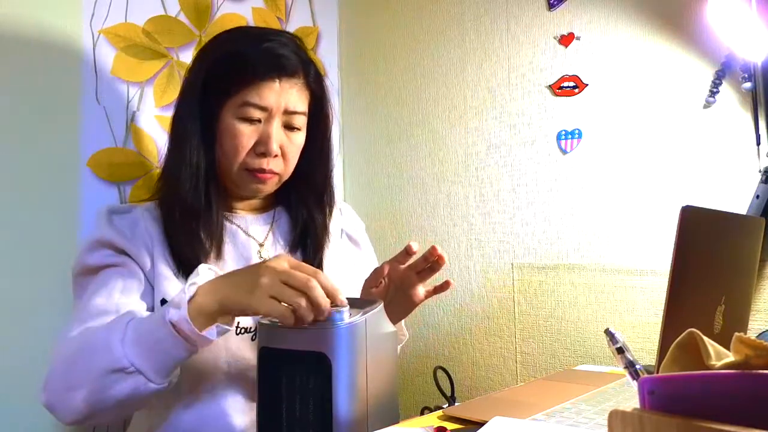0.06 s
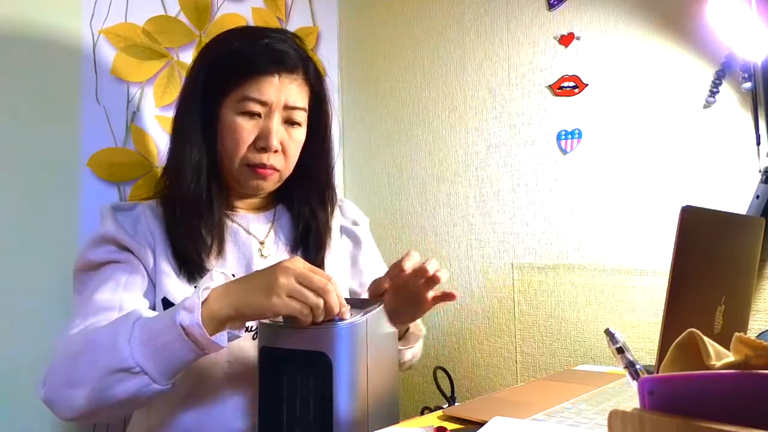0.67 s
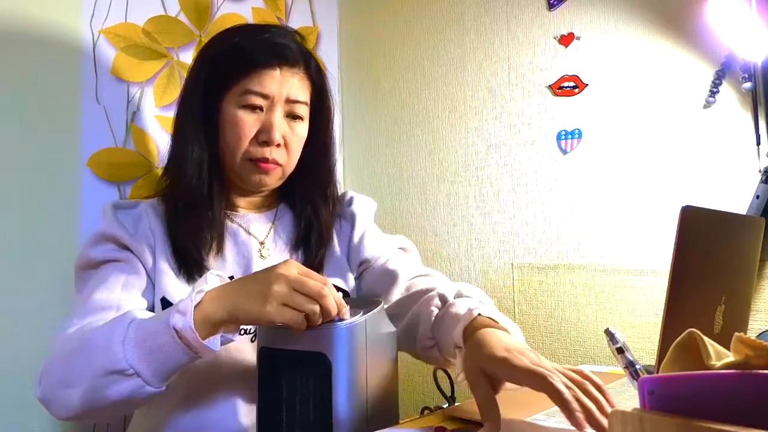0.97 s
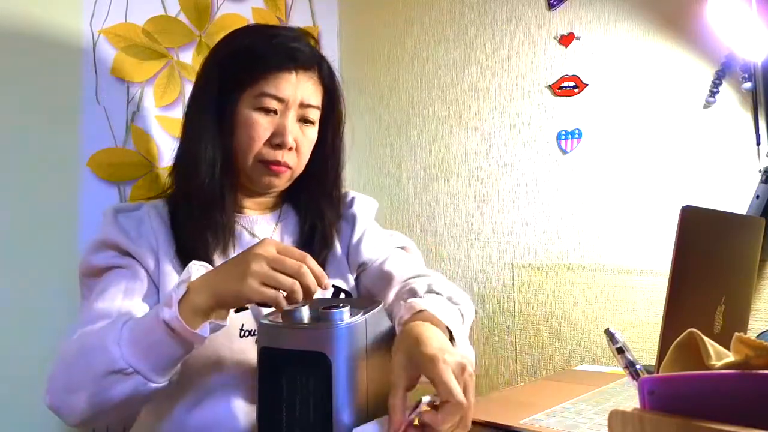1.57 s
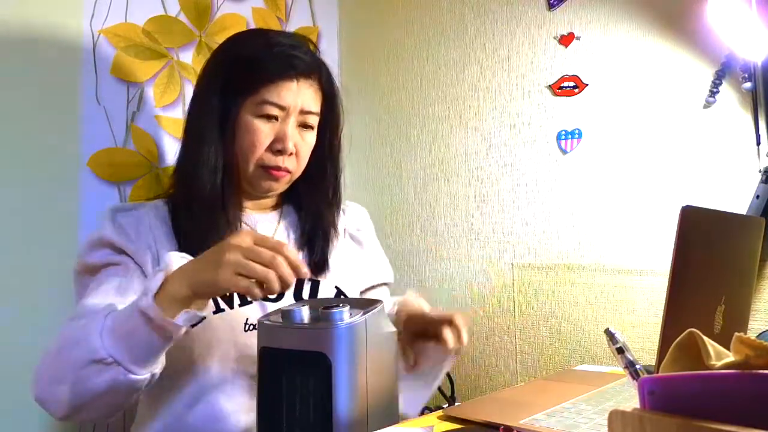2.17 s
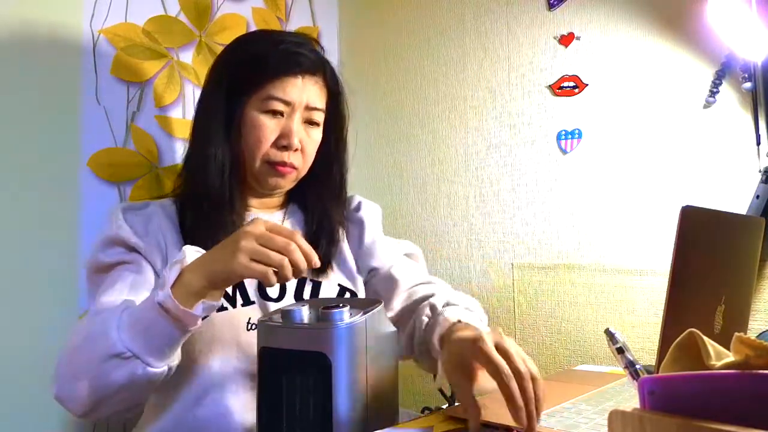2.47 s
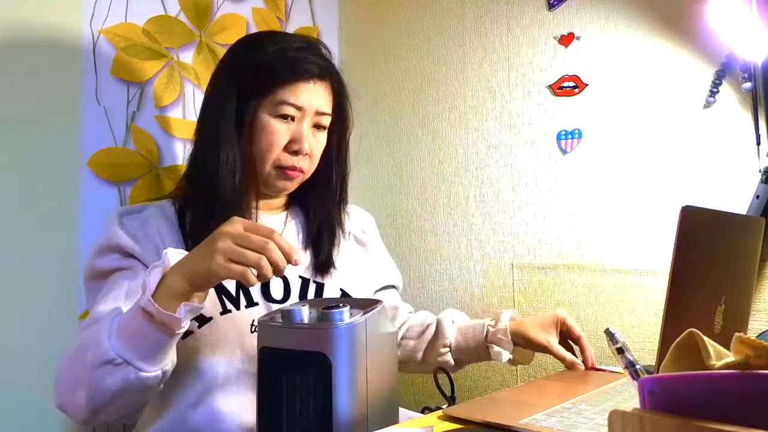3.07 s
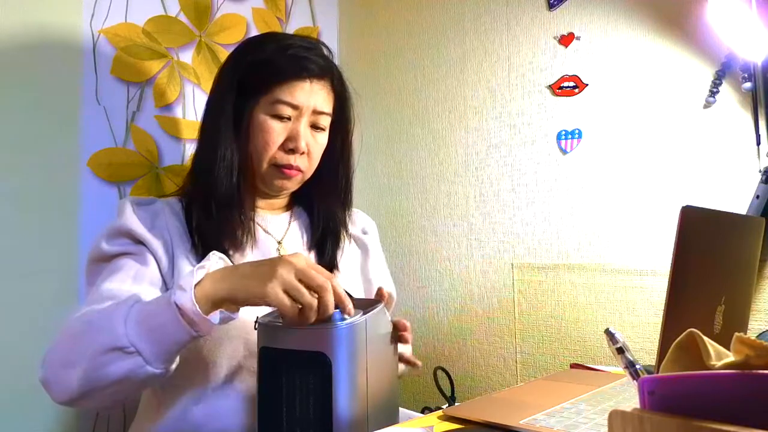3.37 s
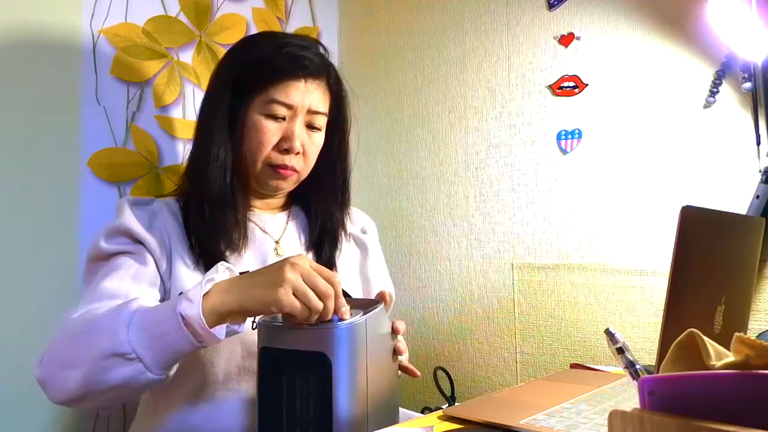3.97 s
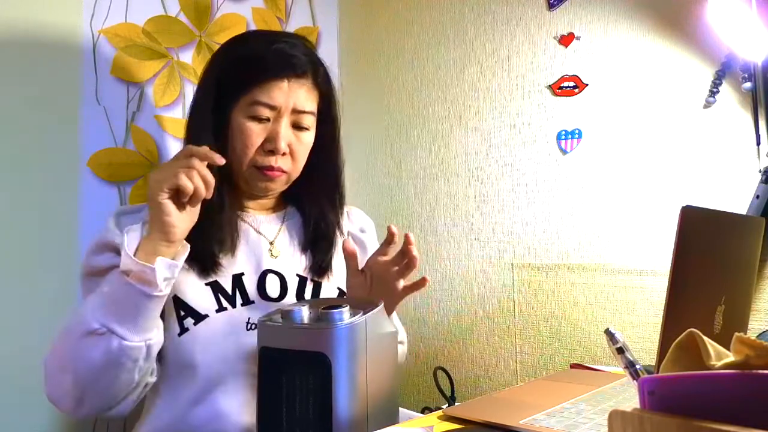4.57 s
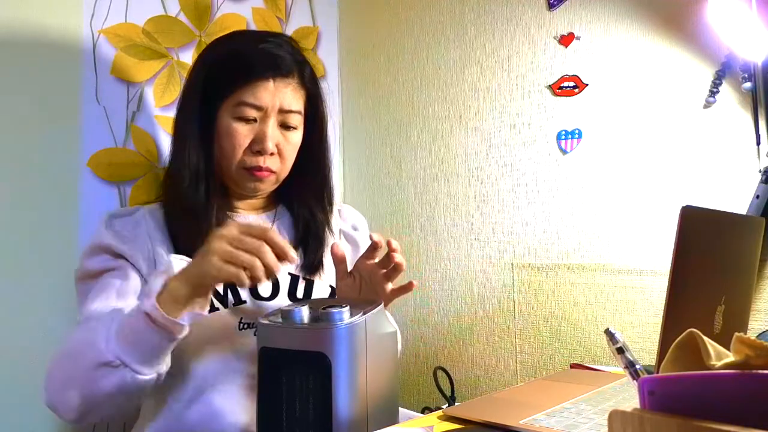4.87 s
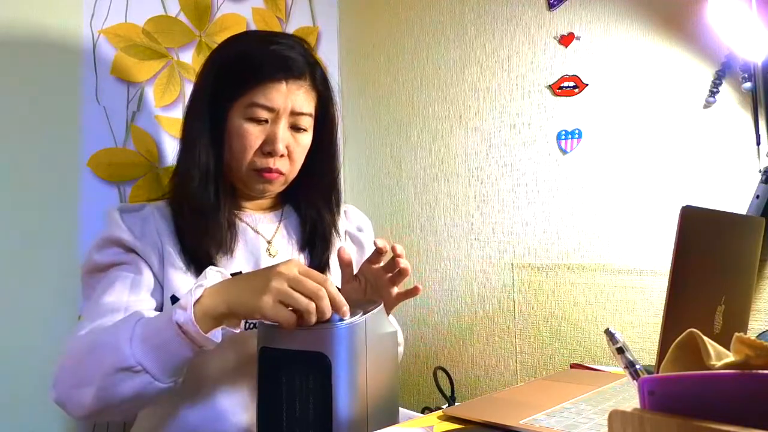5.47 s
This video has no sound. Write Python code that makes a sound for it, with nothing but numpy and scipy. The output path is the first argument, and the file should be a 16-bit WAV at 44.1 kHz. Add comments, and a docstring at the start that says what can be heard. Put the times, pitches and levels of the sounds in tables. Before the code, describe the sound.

A quiet small room holds soft noise, low hums that come and go, and a faint thin whine. A clockwork ticks faintly throughout, about every 0.6 seconds. At 0.2 seconds a small heater's plastic knob clicks. From 1 second a folded paper is picked up, rubbing and crackling. It knocks on the desk at 1.4 seconds and again at 1.6, the loudest moment, when a small metal thing jingles brightly under it. The paper slides around 1.8 seconds, lands with a crackling knock at 2.3, and rustles more softly at 2.6. A faint knock comes at 3 seconds, and the metal thing clinks on the desk at 3.2. The knob clicks twice around 3.4 seconds with a dull finger scrape. Its spring snaps at 4.2, and softer clicks follow at 4.4 and 5.1 seconds. The handling sounds are close and fairly dry.

```python
"""A quiet room: soft noise, low hums that come and go, a faint whine. The plastic knob of a small heater
clicks, and a clockwork ticks faintly throughout. From 1 s a hand picks up a folded paper, which rubs and
crackles as it is knocked on the desk, slid and put down; a small metal thing jingles under it.
At 3.2 s the metal thing, held differently, clinks on the desk. Then the knob clicks twice, with a dull
finger scrape; its spring snaps at 4.2 s, and two softer clicks follow."""
import sys
import numpy as np
from scipy import signal
from scipy.fft import rfft, irfft, next_fast_len
from scipy.io import wavfile
from scipy.ndimage import uniform_filter1d

SR = 44100
rng = np.random.default_rng(int(sys.argv[2]) if len(sys.argv) > 2 else 0)


def transcribe(u):
    """Save the signal u as a 16-bit wav file named by the first command-line argument.

    u: samples, shape (n,) or (channels, n), limited to [-1, 1]; the rate is SR.
    q: integer samples, one column per channel.
    """
    v = np.clip(np.atleast_2d(u).T, -1, 1)
    q = np.round(v * 32767).astype(np.int16)
    wavfile.write(sys.argv[1], SR, q)


N = 248327
T = np.arange(N) / SR
AGE = np.arange(8192) / SR  # seconds into one short event

# modes of the desk top, rung by sliding and by knocks: pitch_hz, level_db, t60_s
DESK_MODES = [(232, 2, 0.088), (280, 3.5, 0.079), (344, -1.5, 0.086), (573, -2.5, 0.18), (689, 1, 0.094),
              (980, -6, 0.06), (982, 4.5, .1), (1740, 10, 0.034), (3520, -15, 0.12), (3920, -18, 0.15),
              (4660, -5, 0.045), (4680, -9, 0.03), (5280, -5, .06), (5700, -19, 0.078)]


def amp(db):
    """Decibels to gain."""
    return 10 ** (np.asarray(db) / 20)


def unit(x):
    """Scale to unit energy."""
    return x / np.sqrt(np.sum(x ** 2))


def loudest(x, db):
    """Scale so that the loudest two milliseconds have this level."""
    return x * amp(db) / np.sqrt(uniform_filter1d(x ** 2, size=88).max())


def fade(t60):
    """Exponential decay, 60 dB down after t60 seconds."""
    return np.exp(-np.log(1000) * AGE / max(t60, 1e-3))


def add(track, start_s, x):
    """Mix a sound into the track."""
    i = int(start_s * SR)
    track[i:i + len(x)] += x[:N - i]


def walk(rate_hz):
    """Smooth random drift with a spread near one."""
    hold = int(SR / rate_hz)
    steps = np.repeat(rng.standard_normal(N // hold + 1), hold)
    return uniform_filter1d(steps, hold)[:N] / np.sqrt(2 / 3)


def swell(peak_s, db, rise_s, fall_s, shape):
    """Gain that climbs 20 dB over rise_s and drops 20 dB over fall_s; shape 1 is pointed, 2 round."""
    away = np.maximum((peak_s - T) / max(rise_s, 1e-3), (T - peak_s) / max(fall_s, 1e-3))
    return amp(db - 20 * np.minimum(away, 10) ** shape)


def colour(x, points):
    """Minimum-phase EQ through (freq_hz, gain_db) points: nothing rings ahead of an attack."""
    size = next_fast_len(len(x) // 2 + 1024, True) * 2
    hz, db = np.transpose(points)
    freqs = np.maximum(np.fft.rfftfreq(size, 1 / SR), 1)
    gain = amp(np.interp(np.log(freqs), np.log(hz), db))
    cepstrum = irfft(np.log(gain))
    cepstrum[1:size // 2] *= 2
    cepstrum[size // 2 + 1:] = 0
    return irfft(rfft(x, size) * np.exp(rfft(cepstrum)))[:len(x)]


def ringing(modes):
    """A struck object's modes, each slightly detuned and at a random phase."""
    chance = rng.standard_normal((len(modes), 2))
    return unit(sum(amp(db) * fade(t60) * np.sin(2 * np.pi * (hz * (1 + 0.0052 * detune) * AGE + phase))
                    for (hz, db, t60), (detune, phase) in zip(modes, chance)))


def clatter(t60):
    """Dense dying vibration with an even spectrum."""
    spectrum = rfft(rng.standard_normal(len(AGE)) * fade(t60))
    contour = np.sqrt(uniform_filter1d(np.abs(spectrum) ** 2, size=120))
    return unit(irfft(spectrum / contour) * fade(10 * t60))


def blows(hits, eq, modes, ring_db, crack_db):
    """Impacts of crack, clatter and ring; contact sets the treble, the spot struck shapes one band."""
    out = np.zeros(N)
    for start_s, db, t60, treble_db, body_hz, body_db in hits:
        hit = clatter(t60) + amp(ring_db) * ringing(modes)
        hit[0] += amp(crack_db)
        hit = colour(hit, eq)
        hit = colour(hit, [(3500, 0), (9000, treble_db)])
        hit = colour(hit, [(body_hz / 1.87, 0), (body_hz, body_db), (body_hz * 1.6, 0)])
        add(out, start_s, loudest(hit, db))
    return out


def room_tone(handling, level_db=-61.5, dip_db=-14.0, recover_s=0.07, flicker_db=0.63):
    """Soft room noise, wider than the near sounds; it ducks briefly after loud handling."""
    # tone of the room noise: freq_hz, gain_db
    noise_eq = [(15, -66), (25, -33), (53, -18), (73, -12), (96, -9.5), (140, -12.5), (289, -10),
                (782, -16.5), (871, -11.5), (1110, -19), (1660, -19.5), (1800, -19), (2170, -21),
                (7910, -30.5), (15500, -43)]
    # its stereo width: freq_hz, side_minus_mid_db
    noise_width = [(60, -9.5), (110, -9), (200, -2), (380, -2), (700, -2.5), (1290, -3), (2380, -3.5),
                   (4400, -1), (8120, 0), (15000, -1)]
    mid, side = (colour(rng.standard_normal(N), noise_eq) for _ in range(2))
    side = colour(side, noise_width)
    step = 1 / (recover_s * SR)
    recent_power = signal.lfilter([step], [1, step - 1], handling ** 2)
    duck = recent_power / (recent_power + amp(-55))
    db = level_db + flicker_db * walk(6.7) + dip_db * duck
    return np.array([mid + side, mid - side]) / mid.std() * amp(db)


def hum(hz, gain, waver_hz=0.34):
    """A tone that wavers slightly in pitch."""
    phase = 2 * np.pi * np.cumsum(hz + waver_hz * walk(4.4)) / SR
    return np.sqrt(2) * np.sin(phase) * gain


def hums(upper_hz=111.3, lower_hz=91, whine_hz=1676, whine_db=-79):
    """Two low hums that come and go, and a thin steady whine."""
    # swells of the upper hum: peak_s, level_db, rise_s, fall_s
    upper_swells = [(.45, -64, 0.58, .95), (1.48, -69.5, 0.46, 0.67)]
    # swells of the lower hum: peak_s, level_db, rise_s, fall_s
    lower_swells = [(1.37, -66, .3, 0.22), (2.3, -71.5, 0.73, 0.98), (4.05, -61.5, 1, 0.66),
                    (5.4, -75.5, .9, .9)]
    upper = hum(upper_hz, sum(swell(*row, shape=1.7) for row in upper_swells))
    lower = hum(lower_hz, sum(swell(*row, shape=1.7) for row in lower_swells))
    return upper + lower + hum(whine_hz, amp(whine_db), waver_hz=8)


def knob_clicks():
    """Each click of the knob rings the heater's plastic shell."""
    # knob clicks: start_s, level_db, t60_s, treble_db, body_hz, body_db
    click_hits = [(.1566, -42, 0.077, 10, 1500, 9), (3.3518, -41, 0.091, 7.5, 940, 4),
                  (3.4642, -39.5, 0.051, 11.5, 705, 10.5), (4.378, -51.5, 0.18, -6, 640, 17),
                  (5.0732, -50.5, 0.098, 11, 1500, 7.5)]
    # tone of a click: freq_hz, gain_db
    click_eq = [(120, -57), (200, 8.5), (1050, 1.5), (1330, 0.5), (1630, -7.5), (2020, 0), (2330, 5),
                (4310, 3.5), (12300, -24), (15000, -40)]
    # modes of the shell: pitch_hz, level_db, t60_s
    shell_modes = [(712, -11.5, 0.11), (1100, -1, 0.089), (1632, 9.5, 0.062), (2300, -3.5, 0.074),
                   (2907, 3.5, 0.055), (4450, -3.5, 0.035), (5380, -0.5, 0.028)]
    return blows(click_hits, click_eq, shell_modes, ring_db=-2.5, crack_db=-17)


def clockwork(first_s=.219, period_s=.5945, lock_s=.0165, bounce_s=.011, bounce_db=-7, spread_db=1.4):
    """Steady ticks: in each the escapement scrapes free, locks with a small ring and bounces once."""
    # tone of a tick: freq_hz, gain_db
    tick_eq = [(300, -4), (1000, 1), (2200, 1), (3300, -7), (4300, -1.5), (5000, -1.5), (7200, 0.5),
               (8200, -11.5), (14000, -24.5)]
    # modes of the escapement: pitch_hz, level_db, t60_s
    tick_modes = [(4150, -6, 0.027), (4190, -2, 0.04), (4440, -4.5, .04), (4380, 3, .025),
                  (4930, -9, 0.033), (6330, -13, .03), (7280, -11, .025)]
    out = np.zeros(N)
    soft_attack = 1 - np.exp(-(AGE / .008) ** 2)
    for tick_s in np.arange(first_s, T[-1], period_s):
        scrape_db, lock_db = np.array([-52, -47]) + spread_db * rng.standard_normal(2)
        scrape = colour(clatter(.13) * soft_attack, tick_eq)
        add(out, tick_s - .007, loudest(scrape, scrape_db))
        for lag_s, db in ((lock_s, lock_db), (lock_s + bounce_s, lock_db + bounce_db)):
            lock = clatter(0.086) + amp(-1) * ringing(tick_modes)
            add(out, tick_s + lag_s, loudest(colour(lock, tick_eq), db))
    return out


def strokes():
    """Envelopes of the rubbing and of its treble: each stroke speeds up and slows down."""
    # rubbing strokes, paper sliding on the desk, then a dull finger scrape by the knob click:
    # fastest_s, level_db, rise_s, fall_s, treble_db
    rubbing_strokes = [(1.1, -36.5, .058, .1, 1.5), (1.178, -41, .022, .028, 5), (1.43, -50, .06, .2, 3),
                       (1.552, -37.5, .04, .036, -1), (1.623, -41.5, .012, .04, -8),
                       (1.81, -31, .11, .11, 2), (1.9, -42, .07, .055, -17), (1.977, -44.5, .048, .03, 8),
                       (2.17, -61, .025, .025, 9), (2.33, -33, .016, .025, 0), (2.368, -46, .025, .035, -4),
                       (2.584, -39.5, .022, .05, 1), (2.636, -44, .022, .024, -8),
                       (3.12, -68, .18, 0.11, 11), (3.453, -52, .05, 0.03, -4)]
    power, treble_power = 0, 0
    for fastest_s, db, rise_s, fall_s, treble_db in rubbing_strokes:
        stroke = swell(fastest_s, db, rise_s, fall_s, shape=1.25) ** 2
        power += stroke
        treble_power += stroke * amp(treble_db) ** 2
    return np.sqrt(power), np.sqrt(treble_power)


def air_pocket(effort, rest_hz=620, fast_hz=1016, halfway_db=-41, width_hz=130):
    """Air trapped under the sheet resonates as a noise band, higher as a faster stroke lifts the sheet."""
    lowpass = signal.butter(2, width_hz, fs=SR, output="sos")
    wobble = signal.sosfilt(lowpass, rng.standard_normal(N) + 1j * rng.standard_normal(N))
    hz = rest_hz + (fast_hz - rest_hz) * effort / (effort + amp(halfway_db))
    band = np.real(wobble * np.exp(2j * np.pi * np.cumsum(hz) / SR))
    return band / band.std()


def sliding(effort, treble, slips_per_s=4500, grain_db=1.5, judder_db=1.14, desk_db=-15, pocket_db=-15):
    """Fibres catch and slip unevenly, exciting paper and desk; the finger scrape shares this texture."""
    # tone of the rubbing: freq_hz, gain_db
    rub_eq = [(70, -47), (170, -25.5), (270, -7), (450, -10), (720, -1), (980, -2), (1280, -7), (1620, 0),
              (2200, -3.5), (3500, 2), (5500, -1.5), (8000, -6), (11000, -14.5), (15500, -28)]
    slipping = rng.random(N) < slips_per_s / SR
    polarity = rng.choice([-1, 1], N)
    strength = np.minimum(rng.exponential(size=N), 3.5)
    slips = slipping * polarity * amp(grain_db * strength + judder_db * walk(180))
    desk = amp(desk_db) * signal.fftconvolve(slips, ringing(DESK_MODES))[:N]
    rub = colour(slips + desk, rub_eq)
    rub = rub / rub.std() + amp(pocket_db) * air_pocket(effort)
    body = signal.sosfiltfilt(signal.butter(2, 5500, fs=SR, output="sos"), rub)
    return effort * body + treble * (rub - body)


def bending(rub, depth_db=2.0, rate_hz=45.28):
    """As the sheet bends, its half-octave bands swell and sink independently."""
    spectrum = rfft(rub)
    half_octaves = 2 * np.log2(np.clip(np.fft.rfftfreq(N, 1 / SR), 250, 16000) / 250)
    bands = (irfft(spectrum * np.maximum(1 - np.abs(half_octaves - k), 0), N) for k in range(13))
    return sum(band * amp(depth_db * walk(rate_hz)) for band in bands)


def crinkles(effort, count=18, offset_db=-5, spread_db=2, centre_hz=5500, rustle_db=-4.5):
    """Cues for small creases at random moments, likelier and louder the harder the stroke."""
    odds = np.cumsum(np.sqrt(effort))
    moments = np.searchsorted(odds, rng.random(count) * odds[-1])
    cues = []
    for i, (accent, detune) in zip(moments, rng.standard_normal((count, 2))):
        db = 20 * np.log10(effort[i]) + offset_db + spread_db * accent
        cues.append((T[i], db, centre_hz * 2 ** (.3 * detune), rustle_db))
    return cues


def creases(effort, pop_t60=0.0052, rustle_t60=0.075, crack_db=-2):
    """A crease flips with a sharp, very short pop and shakes the sheet around it."""
    # the main crease pops: start_s, level_db, centre_hz, rustle_db
    main_pops = [(1.0551, -31.5, 9000, -1), (1.067, -33.5, 8500, 6), (1.2568, -50.5, 4100, 0),
                 (1.4005, -30, 5240, -10), (1.4619, -36, 4700, 9), (1.5355, -29.5, 4940, 5),
                 (1.555, -27, 4870, -2), (1.6798, -26, 5960, -4), (1.706, -32.5, 5330, -6),
                 (1.776, -27.5, 4300, -5), (2.2733, -50, 4800, 7), (2.3325, -27.5, 4450, 13),
                 (2.564, -42, 5030, -8), (2.598, -32, 3420, 9), (3.169, -47.5, 6900, 7)]
    out = np.zeros(N)
    for start_s, db, hz, rustle_db in main_pops + crinkles(effort):
        pop = clatter(pop_t60) + amp(rustle_db) * clatter(rustle_t60)
        pop[0] += amp(crack_db)
        pop_eq = [(150, -20), (hz / 5, -11), (hz / 2, -9), (hz * 0.91, 0), (hz * 1.06, -1),
                  (hz * 2.45, -20), (hz * 4, -35)]
        add(out, start_s, loudest(colour(pop, pop_eq), db))
    return out


def desk_knocks(edge_db=-1.5, edge_treble_db=5, edge_body_share=0.84):
    """Paper and hand land on the desk in two blows: the bright edge, then the fuller flat side."""
    # landings: start_s, level_db, t60_s, treble_db, body_hz, body_db, flat_lag_s
    landings = [(1.372, -31.5, 0.066, -3.5, 2070, 10.5, .0035), (1.635, -23, 0.058, -0.5, 335, 11.5, .0045),
                (2.3205, -27.5, 0.084, -6.5, 427, 8, .008), (2.396, -50.5, 0.069, -14, 2400, 8, .004),
                (2.563, -42, .077, -3, 300, 12.5, .012), (3.001, -50, 0.094, -0.5, 324, 16, .01)]
    # tone of a knock: freq_hz, gain_db
    knock_eq = [(60, -33), (160, -9), (270, -6.5), (600, -2.5), (850, -6.5), (1500, -5.5), (2500, -6.5),
                (3500, -0.5), (4700, -1.5), (6000, -3.5), (8000, -4.5), (11000, -14.5), (15500, -23.5)]
    hits = []
    for start_s, db, t60, treble_db, body_hz, body_db, lag_s in landings:
        edge = (start_s, db + edge_db, t60, treble_db + edge_treble_db, body_hz, body_db * edge_body_share)
        flat = (start_s + lag_s, db, t60, treble_db, body_hz, body_db)
        hits += [edge, flat]
    return blows(hits, knock_eq, DESK_MODES, ring_db=-17, crack_db=-17)


def jingles():
    """A small metal thing under the paper is jolted and rings brightly."""
    # jolts: start_s, level_db, t60_s, treble_db, body_hz, body_db
    jolts = [(1.551, -39.5, .06, 13, 14100, 36), (1.635, -20, 0.073, 6.5, 4000, 4)]
    # tone of a jingle: freq_hz, gain_db
    jingle_eq = [(300, -19), (2500, -22), (3800, 0), (9000, 0), (14000, 5), (14700, -3)]
    # modes of the metal: pitch_hz, level_db, t60_s
    metal_modes = [(3920, 1.5, 0.084), (3800, -4, 0.026), (4180, 2, 0.037), (5860, 8.5, 0.041),
                   (7830, 11, 0.035), (8020, 8, 0.067), (8150, 0, 0.054), (9240, 3, 0.069),
                   (9270, -6, 0.076), (10630, -9, .07), (12500, -4, .045), (13100, -10, 0.054),
                   (12800, -4, .06), (13200, -8, .06), (14150, -6, 0.082)]
    return blows(jolts, jingle_eq, metal_modes, ring_db=3, crack_db=-12)


def clink():
    """The small metal thing, held differently, clinks on the desk in two quick contacts."""
    # contacts: start_s, level_db, t60_s, treble_db, body_hz, body_db
    contacts = [(3.1945, -31.5, 0.051, 7, 597, -18), (3.199, -34.5, 0.055, -9, 600, 5.5)]
    # tone of the clink: freq_hz, gain_db
    clink_eq = [(200, -3), (600, -0.5), (1000, -19), (2100, -14), (3200, 4.5), (6000, 5), (11000, 1),
                (15000, -5)]
    # modes of the metal in this grip: pitch_hz, level_db, t60_s
    clink_modes = [(687, -5.5, 0.11), (2730, -1, 0.054), (3170, 2, 0.029), (3384, 1, 0.04),
                   (4200, -2, 0.027), (4960, 0, 0.035), (6300, -3, 0.048), (7750, 0.5, 0.054),
                   (9330, -17, 0.051), (10700, 1, 0.046), (11220, 1, 0.029), (12900, -3, 0.054),
                   (14100, 6, 0.042), (14600, 1, 0.051), (15100, 0, 0.045)]
    return blows(contacts, clink_eq, clink_modes, ring_db=4, crack_db=-12)


def spring_snap(start_s=4.2346, level_db=-34.5, ring_db=-6, crack_db=-8, contact_db=-7):
    """The knob's spring snaps; bending waves carry the treble first, so the bass is milliseconds late."""
    # modes of the spring and its seat: pitch_hz, level_db, t60_s
    spring_modes = [(551, -1, 0.032), (854, -3.5, 0.056), (1020, -1.5, 0.07), (3100, 1, 0.067),
                    (5100, -1, 0.052)]
    # tone of the snap: freq_hz, gain_db
    snap_eq = [(70, -24), (220, -1), (430, -19), (560, 5), (720, -0.5), (1000, 4), (1300, -3.5), (1650, -5),
               (2100, -7), (3100, -3), (4200, -6.5), (11000, -12), (15000, -25)]
    snap = clatter(.05) + amp(ring_db) * ringing(spring_modes)
    snap[0] += amp(crack_db)
    freqs = np.fft.rfftfreq(len(AGE), 1 / SR)
    delay_s = .016 / np.sqrt(1 + freqs / 450)
    lag_cycles = np.cumsum(delay_s - delay_s[-1]) * freqs[1]
    snap = irfft(rfft(snap) * np.exp(-2j * np.pi * lag_cycles))
    snap += amp(contact_db) * colour(clatter(0.013), [(1000, -7), (6000, 5.5)])  # heard at once
    out = np.zeros(N)
    add(out, start_s, loudest(colour(snap, snap_eq), level_db))
    return out


def room(x, t60=0.14, wet_db=-16):
    """A small furnished room: a short tail, and scattered sound that differs left and right."""
    # stereo width of the near sounds: freq_hz, side_minus_mid_db
    near_width = [(60, -19), (110, -21), (200, -24), (380, -24), (700, -29), (1290, -45), (2380, -60),
                  (4400, -48), (8120, -26.5), (15000, -9.5)]
    tail = clatter(t60) * np.minimum(AGE / 0.0085, 1)
    mid = x + amp(wet_db) * signal.fftconvolve(x, tail)[:N]
    scatter = unit(clatter(.1) * np.minimum(AGE / .002, 1))
    side = colour(signal.fftconvolve(mid, scatter)[:N], near_width)
    return np.array([mid + side, mid - side])


def scene():
    """Knob, paper, clockwork and hum in one room."""
    knob = knob_clicks() + spring_snap()
    impacts = desk_knocks() + jingles() + clink()
    effort, treble = strokes()
    rustle = creases(effort) + bending(sliding(effort, treble))
    handling = knob + impacts + rustle
    return room(handling + clockwork() + hums()) + room_tone(handling)


def record(dry, top_hz=15800):
    """A steep low-pass trims the very top of the mix."""
    return signal.sosfilt(signal.ellip(10, .2, 80, top_hz, fs=SR, output="sos"), dry)


dry = scene()
out = record(dry)
transcribe(out)
```